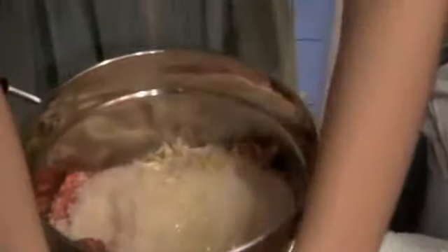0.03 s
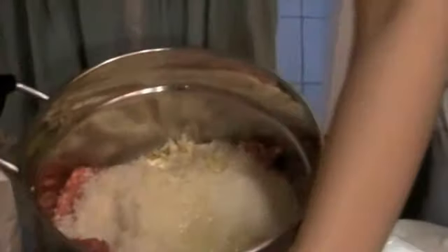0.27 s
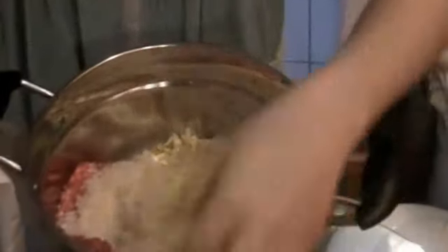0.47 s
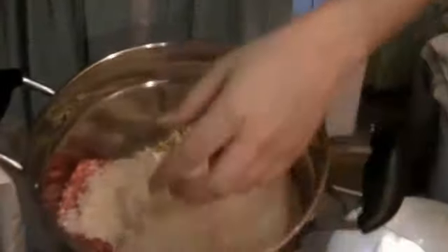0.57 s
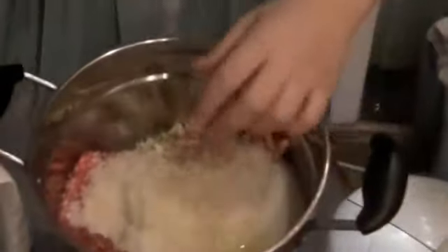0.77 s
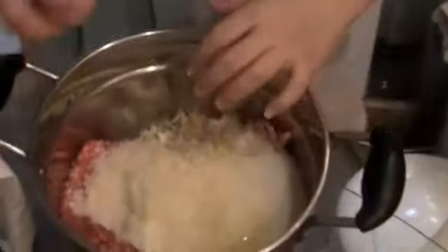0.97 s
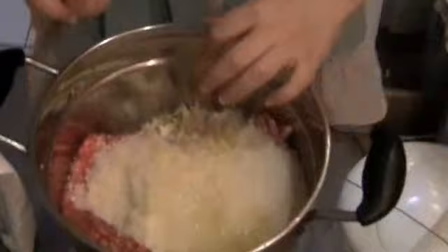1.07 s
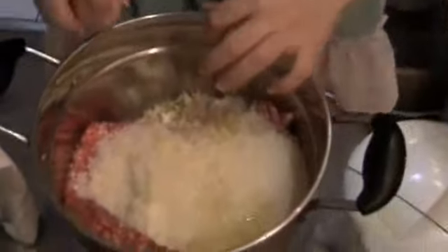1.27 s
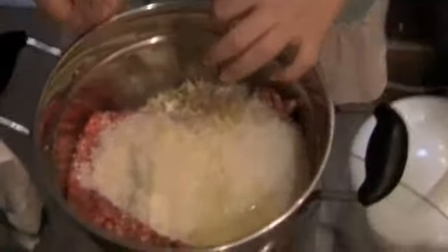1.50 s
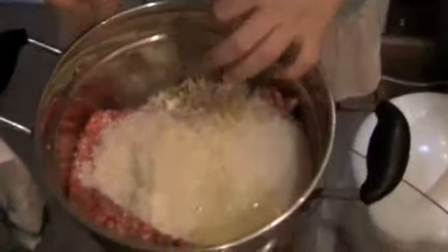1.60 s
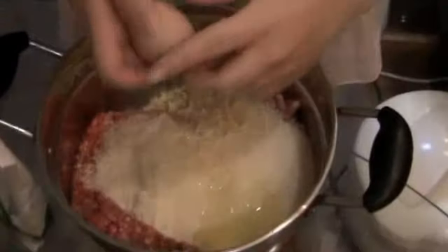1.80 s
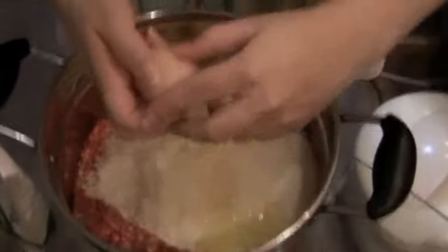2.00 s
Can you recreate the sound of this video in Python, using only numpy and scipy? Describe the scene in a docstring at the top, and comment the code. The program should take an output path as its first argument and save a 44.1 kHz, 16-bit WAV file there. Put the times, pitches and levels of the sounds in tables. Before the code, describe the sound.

An egg is knocked twice on a steel pot's rim, cracking, after a dull bouncing clunk

```python
"""A small, hard-walled kitchen, two microphones close to a large steel pot of mince and crumbs.
Shell ticks and rubs in the fingers as filtered noise bursts and grains, over a steady noise of the room.
Something is put down against the pot with a dull, bouncing clunk: noise bursts and worktop modes.
Then an egg is knocked twice on the rim: damped modes for egg and pot, noise for crunch and crack.
The steel rings briefly, the room answers, and the recorder's limiter ducks after the hardest blows."""
import sys
import numpy as np
from scipy import signal
from scipy.fft import rfft, irfft
from scipy.io import wavfile
from scipy.ndimage import uniform_filter1d, minimum_filter1d

SR = 44100
rng = np.random.default_rng(int(sys.argv[2]) if len(sys.argv) > 2 else 0)


def dump(signal):
    """Clip the signal to [-1, 1] and save it as 16-bit WAV at the path in sys.argv[1]."""
    limited = np.clip(np.atleast_2d(signal).T, -1, 1)
    pcm = np.round(limited * 32767).astype(np.int16)
    wavfile.write(sys.argv[1], SR, pcm)


N = 90404
TIME = np.arange(N) / SR  # seconds
SIZE = 2 ** 18  # samples in a filter transform
HZ = np.maximum(np.arange(SIZE // 2 + 1) * SR / SIZE, 1)

# All levels are relative, ahead of any colouring or cut.
# Steady kitchen noise. Each row: frequency in Hz, level in dB.
HUSH_COLOUR = [(15, -23), (30, -10), (50, -3.5), (110, -7), (180, 3), (230, -3), (400, -6.5), (600, -10),
               (900, -12.5), (1700, -13.5), (3200, -25.5), (7000, -31.5), (13000, -37), (16000, -47)]
HUSH_DB = -50.5  # of the mid signal
# Difference between the microphones in that noise. Each row: frequency in Hz, side level in dB.
HUSH_SIDE_COLOUR = [(60, -11.5), (180, -10.5), (550, -3), (1650, 1), (4970, -5.5), (15000, -1.5)]

# Snaps of handled shell. Each row: start in seconds, level in dB, lower edge in Hz.
SHELL_TICKS = [(0.070, -11.5, 3000), (0.1130, 2, 7100), (0.13, -3, 4500), (0.175, -6, 2000),
               (0.187, -16, 4000), (0.22, -18, 2500), (0.2935, 9, 6000), (0.3535, -2, 2460),
               (0.385, 4, 5000), (0.576, -14, 5940), (0.586, -0.5, 5000), (0.596, -24, 6000),
               (0.659, -9, 3020), (0.6714, 6, 1856), (0.764, -12.5, 2460), (0.8054, -7.5, 2980)]
# Colour of ticks and rubbing. Each row: frequency in Hz, level in dB.
TICK_COLOUR = [(500, -4.5), (2200, -6.5), (4500, -15.5), (8000, -16.5), (12000, -23), (16000, -62)]
TICK_BURST_S, TICK_EARLY_DB, TICK_ROOM_DB = 0.012, -5, -9.5
# Shell rubbing in the fingers. Each row: start in seconds, length in seconds, level in dB.
SHELL_RUSTLES = [(0.077, 0.033, -27.5), (0.111, 0.115, -22.5), (0.568, 0.039, -24.5), (0.667, 0.025, -13.5)]
GRAINS_PER_S, GRAIN_SPREAD_DB = 700, 4.5  # mean rate, standard deviation of level

# Soft bumps of hands and egg. Each row: start in seconds, level in dB, pitch in Hz, T60 in seconds.
SOFT_BUMPS = [(0.1732, -29, 322.4, 0.1), (0.1733, -22.5, 1280, 0.0032), (0.194, -33.5, 326, 0.27),
              (0.6459, -28, 471, 0.027), (0.661, -36.5, 485, .12), (0.661, -38, 323.3, 0.26),
              (0.7646, -21, 1180, 0.0031), (0.8072, -35, 1070, 0.0093), (1.196, -35.5, 586, 0.034),
              (1.199, -40.5, 960, 0.037)]
BUMP_ROOM_DB = -4

# The clunk and its bounces. Each row: start in seconds, level in dB.
CLUNK_BLOWS = [(0.232, -2.5), (0.2365, -1), (0.2511, -2), (0.2541, -2.5), (0.2666, -12), (0.3531, -16.5)]
# Colour of a clunk. Each row: frequency in Hz, level in dB.
CLUNK_COLOUR = [(40, -14), (150, 16), (250, 13), (380, 26), (600, 25.5), (950, 26.5), (1500, 33.5),
                (2300, 27.5), (3600, 19.5), (5000, 14), (8000, 4.5), (11000, -7), (15000, -45)]
CLUNK_RATTLE_S, CLUNK_RATTLE_DB, CLUNK_ROOM_DB = 0.025, -1.5, -3
# The worktop gives under the first blow. Each row: frequency in Hz, level in dB, T60 in seconds.
WORKTOP_RESONANCES = [(393, -6, 0.039), (682, -6, 0.031)]
# The steel pot. Each row: frequency in Hz, level in dB when bumped,
# level in dB when struck on the rim, T60 in seconds.
POT_RESONANCES = [(263.3, -21.5, -26.5, 0.98), (315.2, -20, -20, 0.55), (377.6, -15.5, -31.5, 0.4),
                  (830, -21, -67, 0.5), (950, -12, -32.5, 0.39), (1016, -15, -37.5, 0.43),
                  (1072, -30, -42, 0.438), (1248, -14.5, -43, 0.46), (1325, -23, -54, 0.52),
                  (1443, -13.5, -51.5, 0.29), (1630, -28, -56, .45), (1750, -28, -55, 0.23),
                  (1722, -22, -38.5, 0.36), (1774, -23.5, -38, 0.15), (1902, -22, -27, .45),
                  (2245, -16.5, -24.5, 0.42), (2820, -40, -25, .4), (3450, -22, -32.5, .45),
                  (4006, -24, -52, 0.42), (5310, -53, -32.5, 0.51), (6380, -28.5, -39.5, 0.34),
                  (7450, -75, -22.5, 0.13), (8270, -41, -24, .38)]

# Egg on the rim. Each row: start in seconds, knock level in dB, knock pitch in Hz, thud level in dB,
# pot ring level in dB, crunch level in dB, crack lag in seconds, crack level in dB,
# crack burst setting in seconds, top edge of crunch and crack in Hz.
EGG_KNOCKS = [(1.3678, -5, 1129, -2.5, -4, 7, 0.00017, 5.5, 0.0072, 15100),
              (1.5640, -11, 1038, -3.5, -10, -17.5, 0.00158, 2, 0.0066, 9700)]
# Knock of the whole egg. Each row: multiple of the knock pitch, level in dB, T60 in seconds.
EGG_RESONANCES = [(.54, -20, .018), (1.001, 1.5, 0.023), (1.379, 8, 0.003), (2.4, 2.5, 0.0043)]
# The filled pot takes the push. Each row: frequency in Hz, level in dB, T60 in seconds.
THUD_RESONANCES = [(154, -18, 0.053), (320, -46, .06), (594, -13, 0.054)]
KNOCK_HIGHPASS_HZ, KNOCK_ROOM_DB = 457, -5
KNOCK_SOFT_HZ = 2280  # the shell gives, which rounds off the knock
# Colour of the shell caving in. Each row: frequency in Hz, level in dB.
CRUNCH_COLOUR = [(40, 19), (120, 1), (500, 11), (1000, 18.5), (1600, 23.5), (2300, 14), (3000, 11.5),
                 (4200, 17), (8000, -1)]
# Colour of breaking shell. Each row: frequency in Hz, level in dB.
CRACK_COLOUR = [(40, -31), (500, 14), (2000, 10.5), (3000, 9.5), (3700, 15), (4400, 6.5), (5100, 9.5),
                (5600, 21), (6300, 20), (6900, 13.5), (7500, 16.5), (9300, 15.5), (10200, 11), (13000, 10),
                (16000, 2)]
CRACK_EARLY_DB, CRACK_ROOM_DB = -8.5, -7.5

# Reverberation of the kitchen. Each row: band centre in Hz, T60 in seconds.
ROOM_DECAY = [(150, 0.55), (400, 0.52), (1500, 0.48), (3500, 0.53), (7000, 0.36), (13000, 0.31)]
# Difference between the microphones in diffuse sound. Each row: frequency in Hz, side level in dB.
ROOM_SIDE_COLOUR = [(100, -22.5), (400, -17.5), (1500, -14.5), (6000, -13.5), (12000, -4)]
EARLY_BURST_S, ROOM_DELAY_S, WALL_CUT_HZ = 0.024, .005, 11500

# Mismatch of the microphones. Each row: frequency in Hz, left minus right in dB.
MIC_LEVELS = [(60, -1.5), (150, -0.9), (280, -3), (700, -0.8), (2000, 0.3), (6000, .5), (12000, -1)]
# Phase between the microphones. Each row: frequency in Hz, lead of the left in radians.
MIC_LEAD = [(100, .12), (1000, .1), (4000, -.2), (9000, -.3), (11000, -.6), (12500, -1.3), (16000, -1.6)]
LIMIT_DB, LIMIT_WINDOW_S, LIMIT_HOLD_S, LIMIT_RELEASE_DB_PER_S = -6.5, 0.0029, 0.058, 104
CEILING, CUTOFF_HZ = .97, 16300  # full scale is 1


def from_db(db):
    """Decibels to gain."""
    return 10 ** (np.asarray(db) / 20)


def at_hz(points, hz):
    """Read a table on a log-frequency axis."""
    f, value = np.transpose(points)
    return np.interp(np.log(hz), np.log(f), value)


def colour(x, spectrum):
    """Causal (minimum-phase) filter with the given spectrum."""
    cepstrum = irfft(np.log(from_db(at_hz(spectrum, HZ))))[:SIZE // 2]
    cepstrum[1:] *= 2  # fold the negative-time half forward
    response = np.exp(rfft(cepstrum, SIZE))
    return irfft(rfft(x, SIZE) * response)[..., :N]


def cut(x, hz, kind):
    """Second-order high- or low-pass."""
    sections = signal.butter(2, min(hz, SR / 2 - 1), kind, fs=SR, output="sos")
    return signal.sosfilt(sections, x + 1e-18)


def fade(t60):
    """Exponential decay from 1, falling 60 dB in t60 seconds."""
    return np.exp(-np.minimum(np.log(1000) * TIME / t60, 100))


def place(x, s):
    """Start a sound at time s."""
    return np.concatenate([np.zeros(max(int(s * SR), 0)), x])[:N]


def ring(hz, t60):
    """One struck mode: a sine under a decay from 1."""
    return np.sin(2 * np.pi * hz * TIME) * fade(t60)


def burst(seconds):
    """A dying spray of tiny contacts: noise flattened in spectrum, faded again, energy 1."""
    x = rng.standard_normal(N) * fade(seconds)
    length = min(int(2 * seconds * SR), N)
    spectrum = rfft(x[:length])
    flat = irfft(spectrum / np.abs(spectrum), length)
    x = np.pad(flat, (0, N - length)) * fade(2 * seconds)
    return x / np.linalg.norm(x)


def convolve(x, response):
    """Pass a sound through a response."""
    return signal.fftconvolve(x, response)[:N]


def spread(mid, side):
    """Mid and side to left and right."""
    return np.array([mid + side, mid - side])


def near_walls(x, early_db):
    """Add the quick reflections from the pot wall and the worktop, as a short noise burst."""
    reflections = place(burst(EARLY_BURST_S), .002)
    return x + from_db(early_db) * convolve(x, reflections)


def hush():
    """The steady noise of the kitchen: coloured noise with its own stereo width by frequency."""
    mid, side = colour(rng.standard_normal((2, N)), HUSH_COLOUR)
    return from_db(HUSH_DB) * spread(mid, colour(side, HUSH_SIDE_COLOUR)) / mid.std()


def shell_ticks():
    """Small snaps of handled shell, each a short high-passed burst."""
    snaps = 0
    for s, db, low_edge_hz in SHELL_TICKS:
        snap = cut(burst(TICK_BURST_S), low_edge_hz, "high")
        snaps = snaps + from_db(db) * place(snap, s)
    return near_walls(colour(snaps, TICK_COLOUR), TICK_EARLY_DB)


def shell_rustle():
    """Bits of shell rub together in sparse random grains of uneven strength."""
    rubbing = sum(from_db(db) * ((TIME > s) & (TIME < s + length)) for s, length, db in SHELL_RUSTLES)
    contacts = rng.random(N) < GRAINS_PER_S / SR
    polarity = rng.choice([-1, 1], N)
    strength = from_db(GRAIN_SPREAD_DB * rng.standard_normal(N))
    grains = contacts * polarity * strength
    return near_walls(colour(rubbing * grains, TICK_COLOUR), early_db=-2)


def bumps():
    """Soft contacts, each one damped tone with little bass under it."""
    out = 0
    for s, db, hz, t60 in SOFT_BUMPS:
        tone = cut(ring(hz, t60), .5 * hz, "high")
        out = out + from_db(db) * place(tone, s)
    return out


def clunk():
    """A dull blow that thumps the worktop, and its bounces, each with a short rattle."""
    blows = 0
    for s, db in CLUNK_BLOWS:
        impact = from_db(-4) * burst(0.0063)
        rattle = from_db(CLUNK_RATTLE_DB) * burst(CLUNK_RATTLE_S)
        blows = blows + from_db(db) * place(impact + rattle, s)
    thump = sum(from_db(db) * ring(hz, t60) for hz, db, t60 in WORKTOP_RESONANCES)
    first_s = CLUNK_BLOWS[0][0]
    return colour(blows, CLUNK_COLOUR) + place(cut(thump, hz=258, kind="high"), first_s)


def pot_ring():
    """Steel modes ring on after the first clunk and each blow on the rim, with random polarity."""
    bumped, struck = 0, 0
    for hz, bumped_db, _, t60 in POT_RESONANCES:
        bumped = bumped + from_db(bumped_db) * ring(hz, t60) * rng.choice([-1, 1])
    for hz, _, struck_db, t60 in POT_RESONANCES:
        struck = struck + from_db(struck_db) * ring(hz, t60) * rng.choice([-1, 1])
    out = place(bumped, CLUNK_BLOWS[0][0])
    for s, _, _, _, ring_db, *_ in EGG_KNOCKS:
        out = out + from_db(ring_db) * place(struck, s)
    return out


def egg():
    """Each blow on the rim: damped modes of the hollow egg and a low thud from the filled pot."""
    out = 0
    for s, knock_db, pitch_hz, thud_db, *_ in EGG_KNOCKS:
        knock = sum(from_db(knock_db + db) * ring(pitch_hz * k, t60) for k, db, t60 in EGG_RESONANCES)
        knock = cut(cut(knock, KNOCK_HIGHPASS_HZ, "high"), KNOCK_SOFT_HZ, "low")
        thud = sum(from_db(thud_db + db) * ring(hz, t60) for hz, db, t60 in THUD_RESONANCES)
        out = out + place(knock + cut(thud, hz=118, kind="high"), s)
    return near_walls(out, early_db=-18.5)


def shell_cracks():
    """The shell caves in with a crunch, then splits with a bright crack: two coloured bursts."""
    crunches, cracks = 0, 0
    for s, *_, crunch_db, lag, crack_db, crack_burst_s, top_hz in EGG_KNOCKS:
        crunch = cut(burst(0.0034), top_hz, "low")
        crack = cut(cut(burst(crack_burst_s), top_hz, "low"), top_hz, "low")
        crunches = crunches + from_db(crunch_db) * place(crunch, s)
        cracks = cracks + from_db(crack_db) * place(crack, s + lag)
    broken = colour(crunches, CRUNCH_COLOUR) + colour(cracks, CRACK_COLOUR)
    return near_walls(broken, CRACK_EARLY_DB)


def room_tail():
    """Diffuse response of the kitchen: noise in overlapping bands, dying fastest in the top treble."""
    white, tail = rfft(rng.standard_normal(N)), 0
    hz = np.maximum(np.arange(len(white)) * SR / N, 1)
    centres = [f for f, _ in ROOM_DECAY]
    for share, (_, t60) in zip(np.eye(len(centres)), ROOM_DECAY):
        band = np.interp(np.log(hz), np.log(centres), share)
        tail = tail + irfft(white * band, N) * fade(t60)
    return place(tail / np.linalg.norm(tail), ROOM_DELAY_S)


def kitchen(x):
    """Stereo reverberation, dulled by the walls and nearly alike at the two close microphones."""
    x = signal.sosfilt(signal.butter(10, WALL_CUT_HZ, fs=SR, output="sos"), x)
    mid = convolve(x, room_tail())
    side = colour(convolve(x, room_tail()), ROOM_SIDE_COLOUR)
    return spread(mid, side)


def scene():
    """Contacts with their shares of room, plus the pot ring and the hush without added room."""
    sources = [
        (clunk(), CLUNK_ROOM_DB),
        (egg(), KNOCK_ROOM_DB),
        (shell_cracks(), CRACK_ROOM_DB),
        (shell_ticks() + shell_rustle(), TICK_ROOM_DB),
        (bumps(), BUMP_ROOM_DB),
    ]
    direct = sum(x for x, _ in sources) + pot_ring()
    to_room = sum(from_db(room_db) * x for x, room_db in sources)
    return direct + kitchen(to_room) + hush()


def limiter(x):
    """The gain drops at once on a loud blow, holds, then climbs back at a steady rate in dB."""
    window = int(LIMIT_WINDOW_S * SR)
    power = uniform_filter1d(np.mean(x ** 2, axis=0), window)
    over_db = np.maximum(10 * np.log10(np.maximum(power, 1e-12)) - LIMIT_DB, 0)
    half = int(LIMIT_HOLD_S * SR / 2)
    held = -minimum_filter1d(-over_db, 2 * half + 1, origin=half)  # highest over the hold time
    climb = LIMIT_RELEASE_DB_PER_S * TIME
    reduction_db = np.maximum.accumulate(held + climb) - climb
    return x * from_db(-uniform_filter1d(reduction_db, window))


def record(dry):
    """Two slightly unlike microphones, a limiter, rounded peaks and the top cut."""
    # half of the mismatch goes to each side
    unlike = np.sqrt(from_db(at_hz(MIC_LEVELS, HZ))) * np.exp(.5j * at_hz(MIC_LEAD, HZ))
    heard = irfft(rfft(dry, SIZE) * np.array([unlike, 1 / unlike]))[:, :N]
    rounded = CEILING * np.tanh(limiter(heard) / CEILING)
    top_cut = signal.ellip(10, .1, 80, CUTOFF_HZ, fs=SR, output="sos")
    return signal.sosfilt(top_cut, rounded)


dry = scene()
out = record(dry)
dump(out)
```